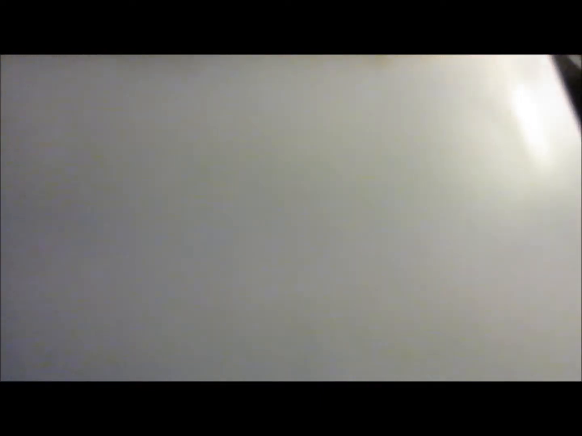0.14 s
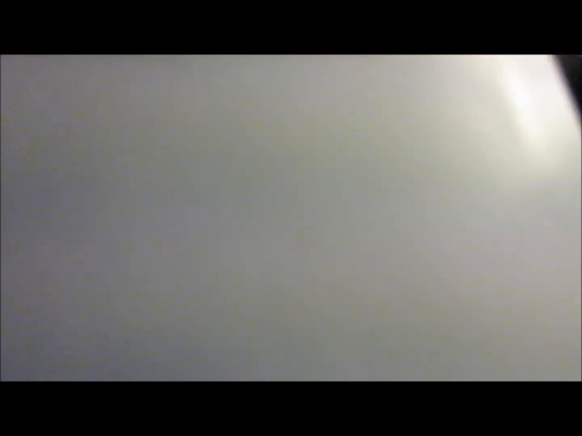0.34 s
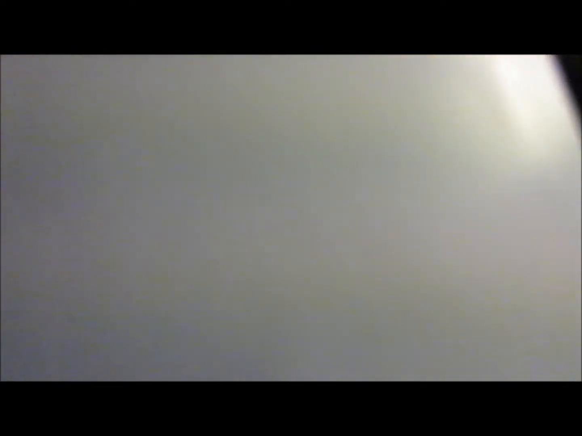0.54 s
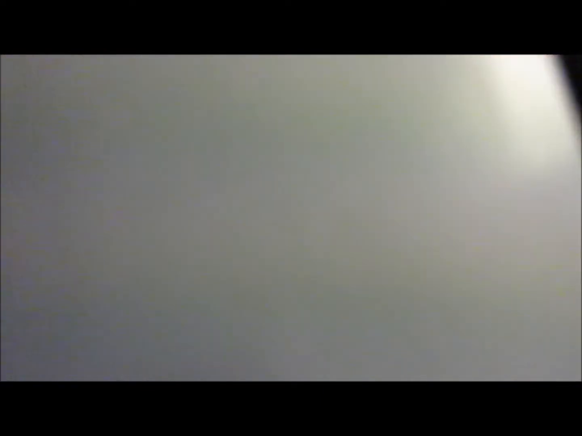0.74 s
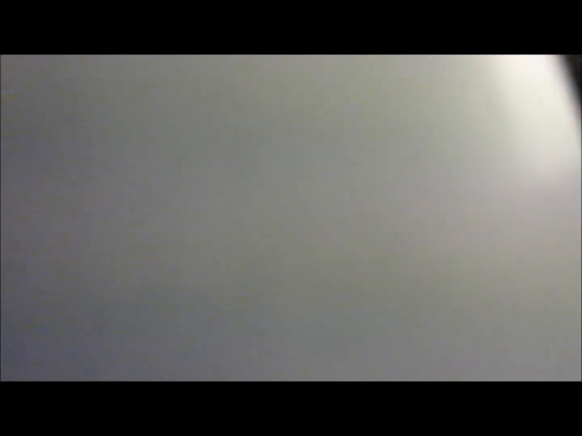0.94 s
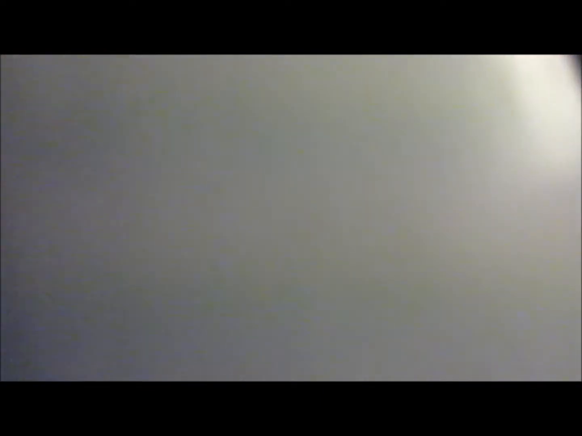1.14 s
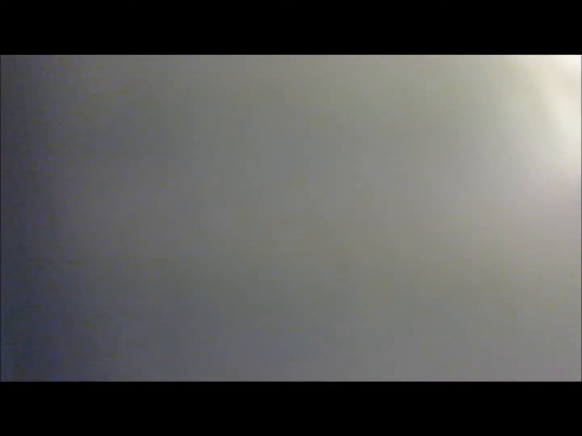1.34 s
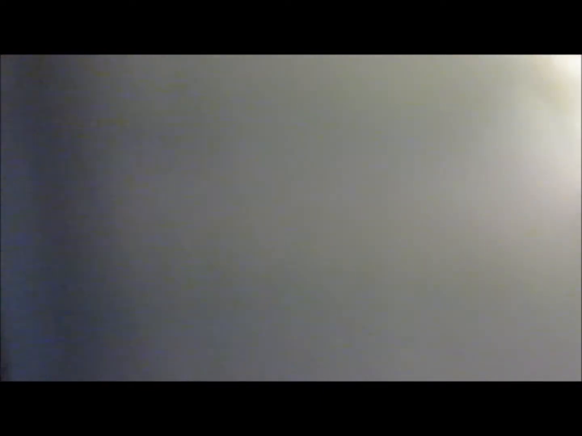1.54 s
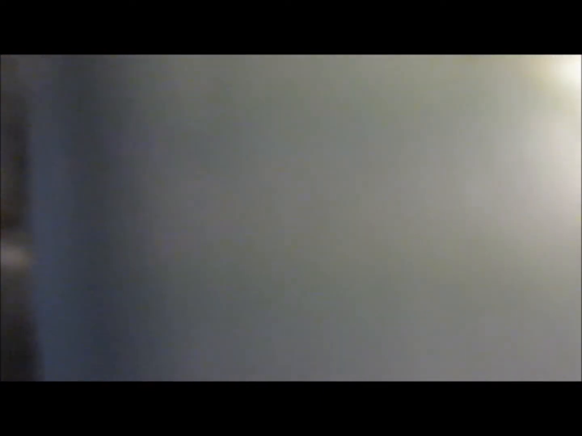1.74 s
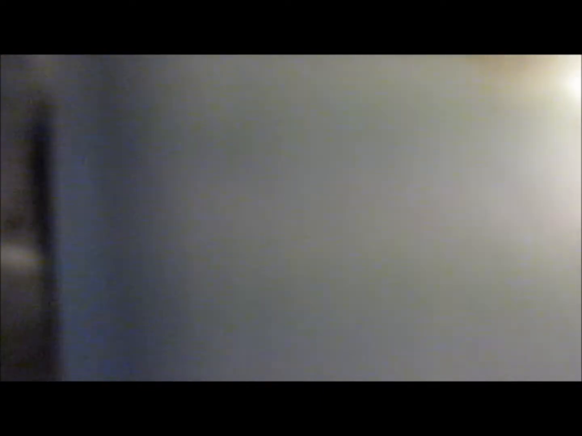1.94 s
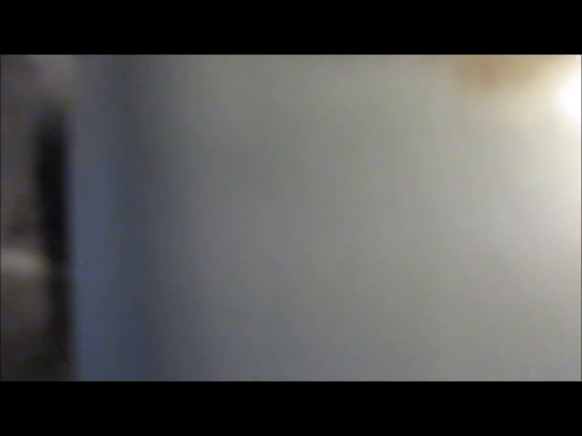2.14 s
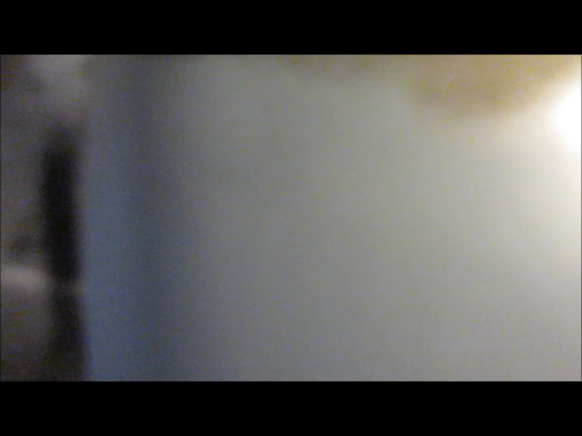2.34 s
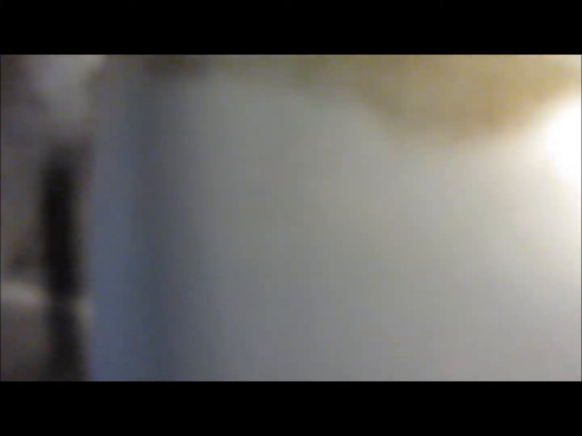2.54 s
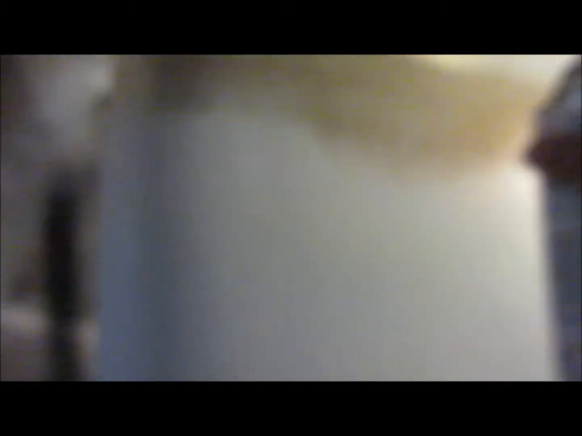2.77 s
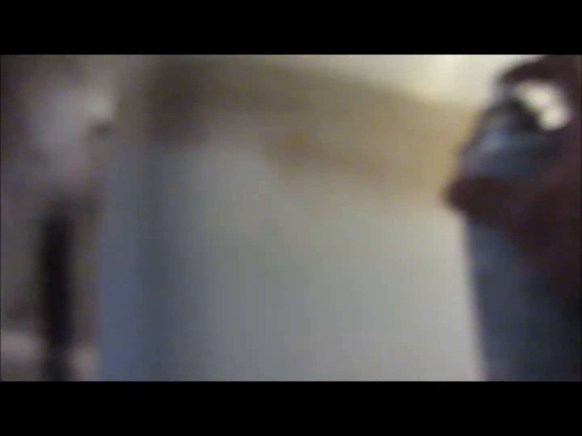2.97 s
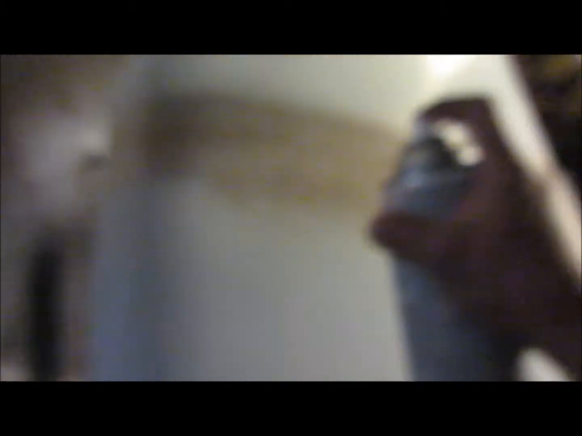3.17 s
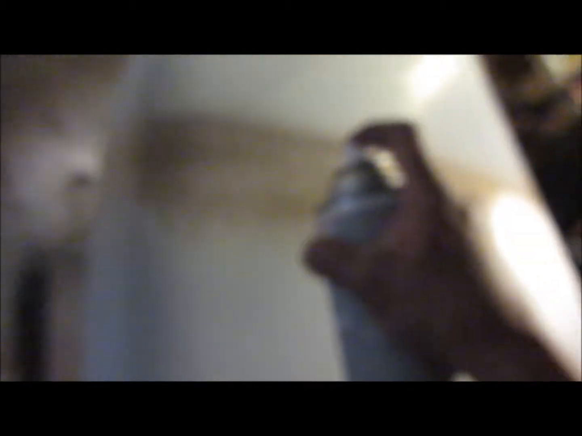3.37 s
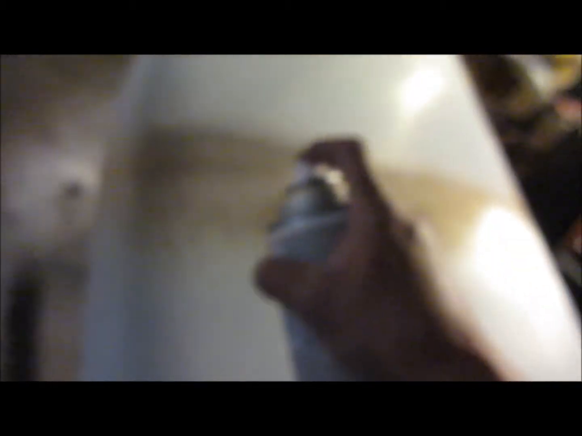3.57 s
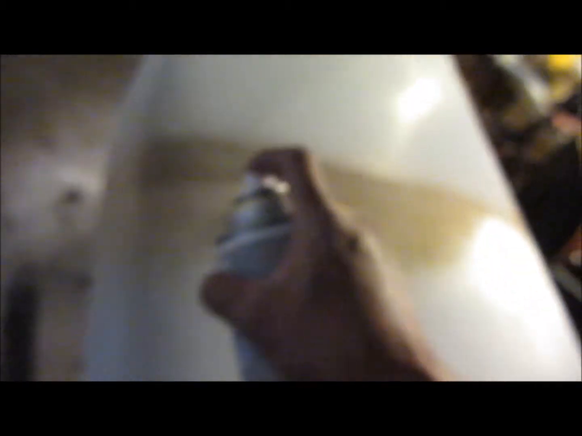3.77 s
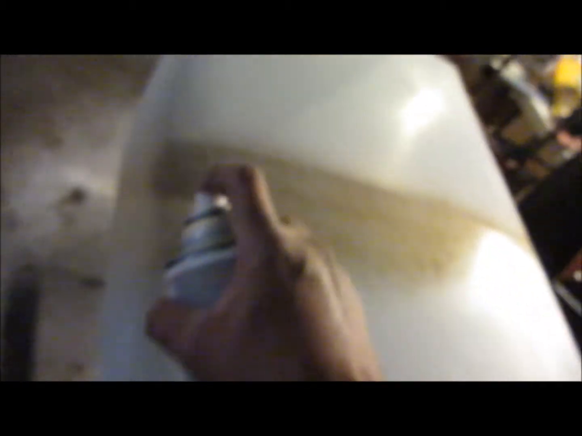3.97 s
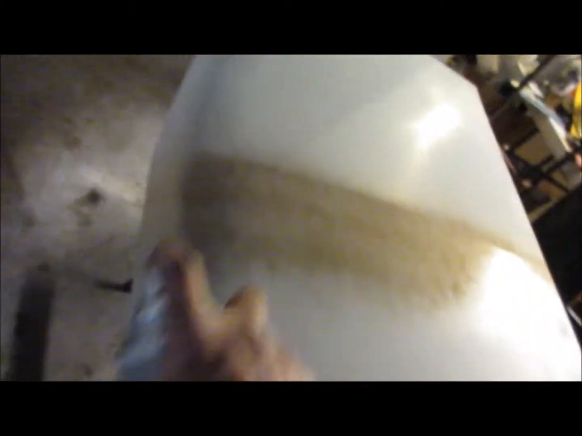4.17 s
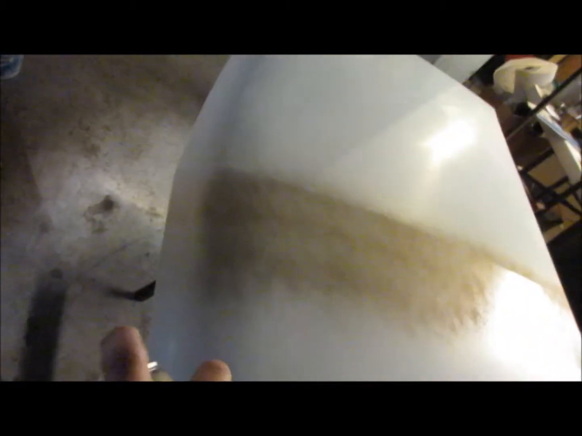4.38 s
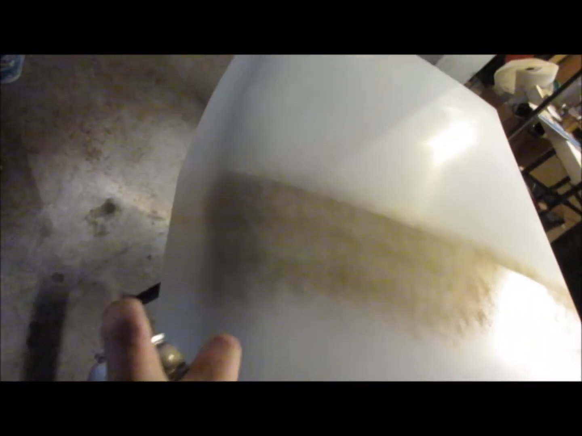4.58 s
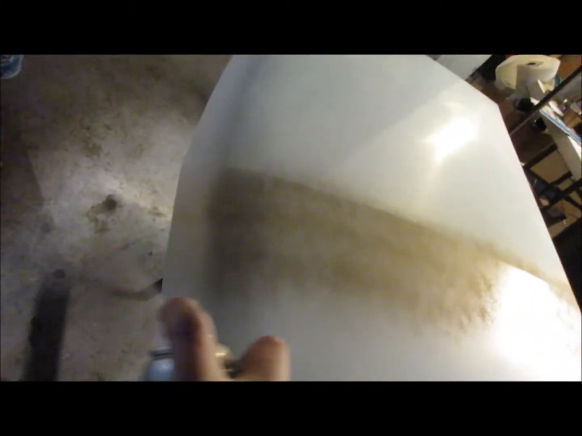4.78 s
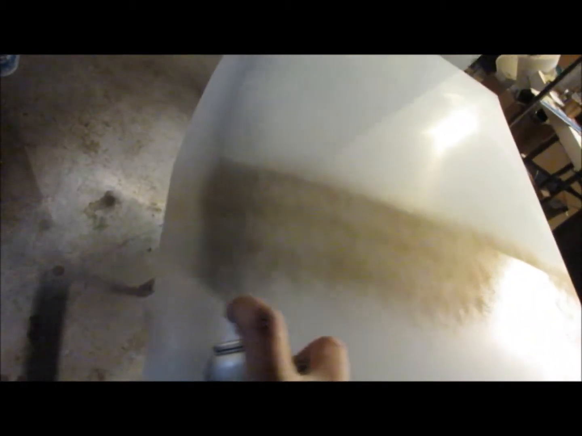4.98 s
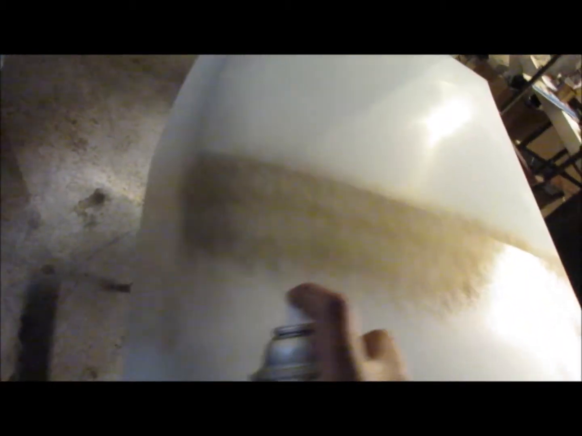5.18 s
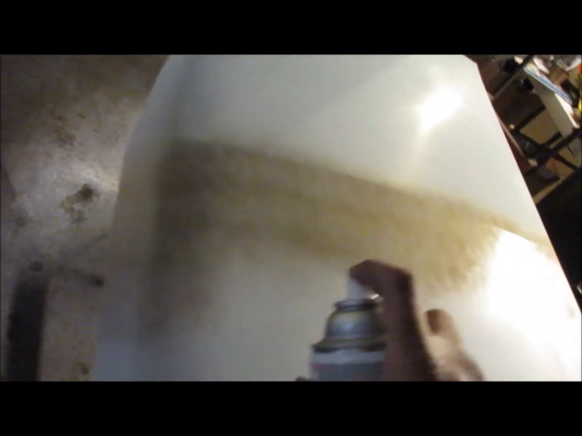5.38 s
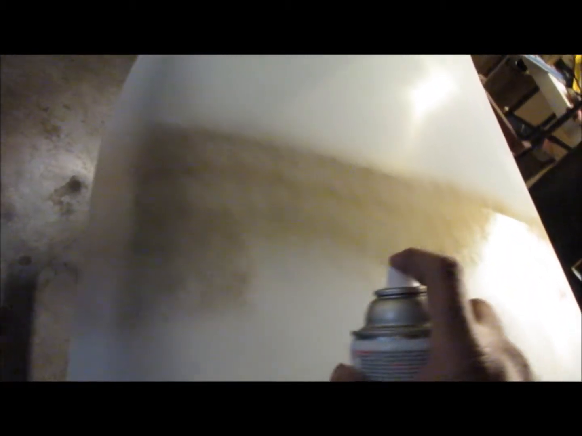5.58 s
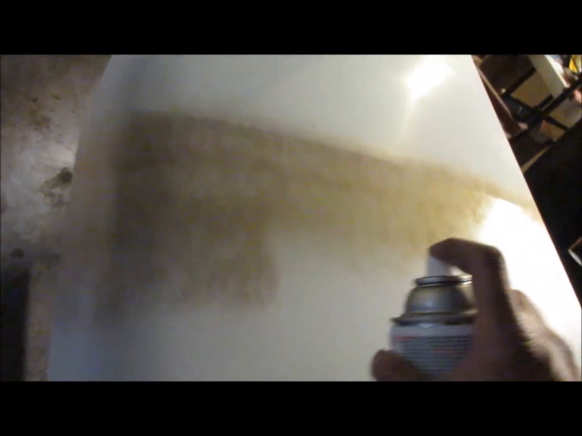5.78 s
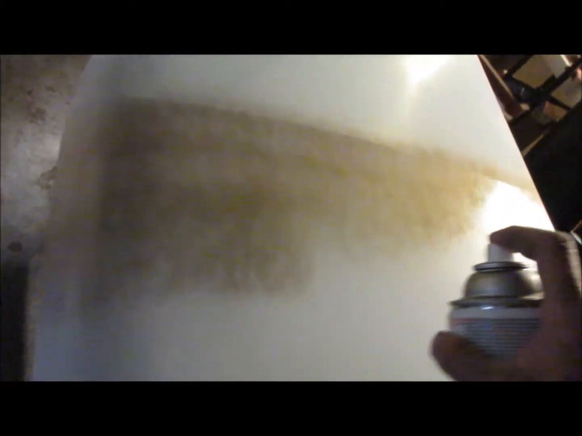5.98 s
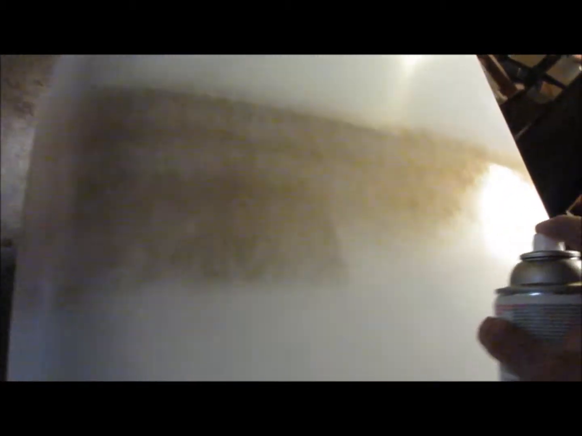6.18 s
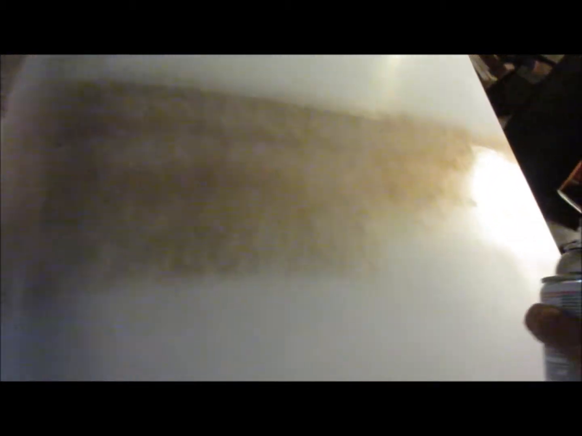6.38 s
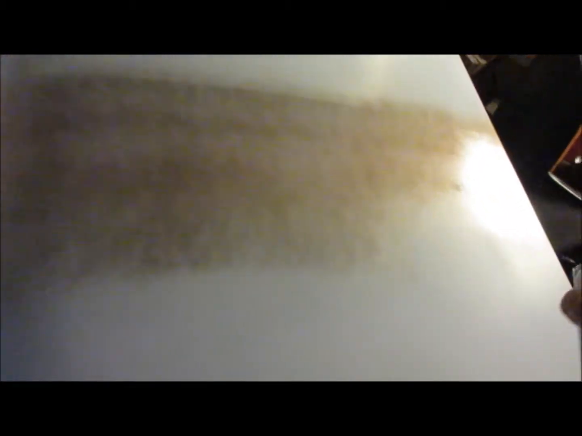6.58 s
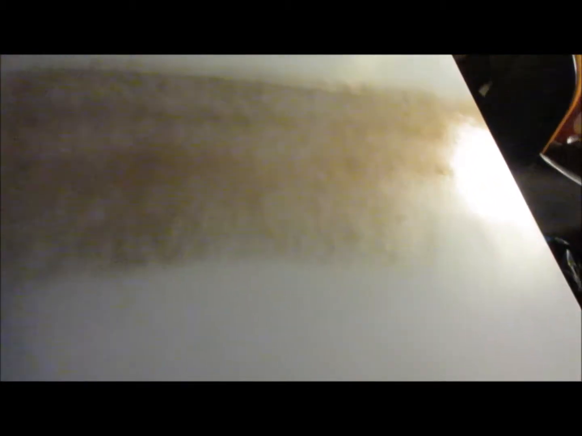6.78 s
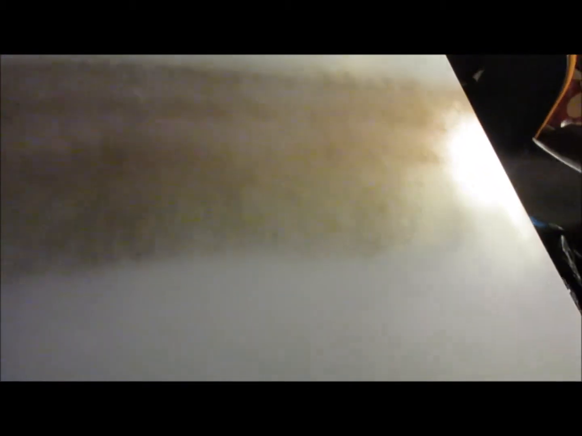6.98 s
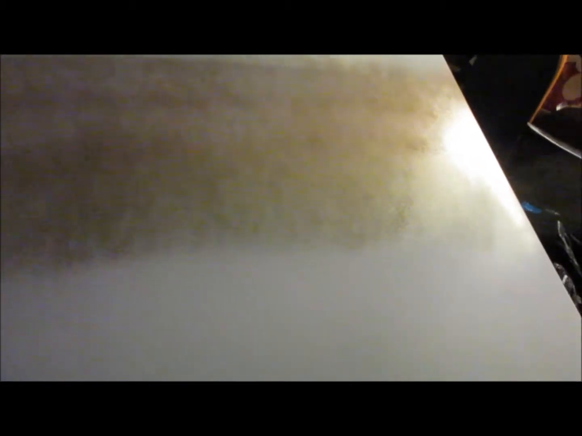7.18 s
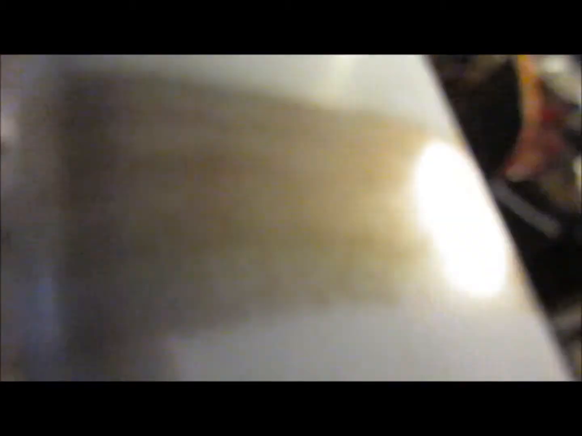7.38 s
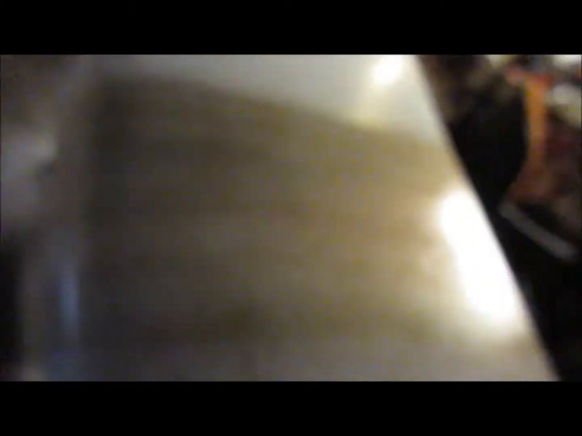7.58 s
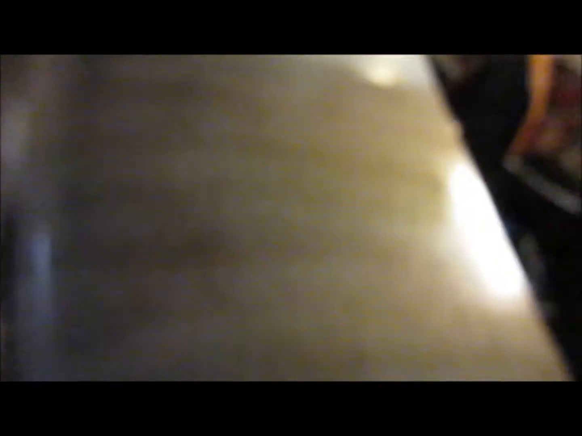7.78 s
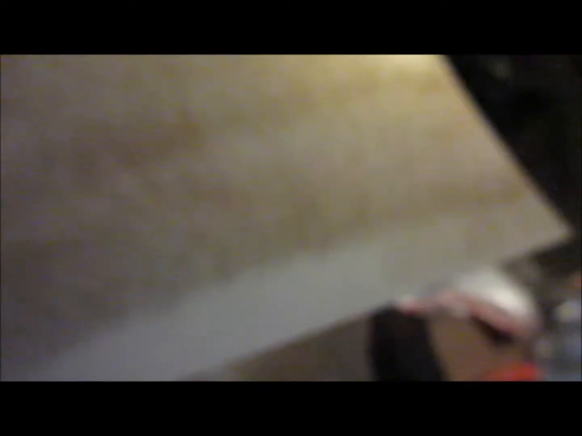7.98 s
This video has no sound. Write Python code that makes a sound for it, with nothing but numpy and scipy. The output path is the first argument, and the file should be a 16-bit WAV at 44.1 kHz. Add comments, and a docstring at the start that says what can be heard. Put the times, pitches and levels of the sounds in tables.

```python
"""A short burst of spray-can hiss, then two long passes of paint on a car panel in a garage.
The turbulent jet is heard directly and again off the panel, so a comb of notches glides through the
hiss as the hand sweeps. Soft blips, whooshes, puffs of gas and faint tones come and go over a low
rumble and mains hum. The sound is mono and cuts off abruptly during the last pass."""
import sys
import numpy as np
from scipy import signal
from scipy.fft import rfft, irfft, next_fast_len
from scipy.io import wavfile
from scipy.ndimage import uniform_filter1d, map_coordinates

SR = 44100
rng = np.random.default_rng(int(sys.argv[2]) if len(sys.argv) > 2 else 0)


def unload_audio(sound):
    """Save the sound as a 16-bit wav file, at the path given as the first command line argument."""
    columns = np.transpose(np.atleast_2d(sound))
    # keep every value between -1 and 1, then stretch to whole-number steps
    steps = np.round(np.clip(columns, -1, 1) * 32767)
    wavfile.write(sys.argv[1], SR, steps.astype(np.int16))


N = 353682
TIME = np.arange(N) / SR


def from_db(db):
    """Decibels to gain."""
    return 10 ** (np.asarray(db) / 20)


def unit_rms(x):
    """Scale to an rms of 1."""
    return x / np.sqrt(np.mean(x ** 2) + 1e-20)


def step(x):
    """A smooth step from 0 to 1 around x = 0."""
    return .5 + .5 * np.tanh(x)


def swell(start, length):
    """A rounded rise and fall."""
    return np.sqrt(2 * np.abs(np.sin(np.pi * np.clip((TIME - start) / length, 0, 1))))


def curve(points):
    """Join (seconds, value) points with straight lines."""
    return np.interp(TIME, *np.transpose(points))


def noise(spectrum):
    """Steady noise of rms 1 with a (Hz, dB) spectrum, falling away beyond its ends."""
    size = next_fast_len(N)
    hz, db = np.transpose(spectrum)
    bins = np.maximum(np.fft.rfftfreq(size, 1 / SR), 1)
    skirts = np.minimum(bins / hz[0], 1) ** 2 * np.minimum(hz[-1] / bins, 1) ** 2
    gain = from_db(np.interp(np.log(bins), np.log(hz), db)) * skirts
    return unit_rms(irfft(rfft(rng.standard_normal(size)) * gain, size)[:N])


def noise_band(hz, width):
    """Noise of rms 1 ringing through one resonance."""
    r = np.exp(-np.pi * width / SR)
    poles = [1, -2 * r * np.cos(2 * np.pi * hz / SR), r * r]
    return unit_rms(signal.lfilter([1, 0, -1], poles, rng.standard_normal(N)))


def drift(rate_hz):
    """A random wobble of rms 1, mostly slower than rate_hz."""
    r = np.exp(-2 * np.pi * rate_hz / SR)
    return unit_rms(signal.lfilter([1], [1, -2 * r, r * r], rng.standard_normal(N + SR))[SR:])


def delayed(x, lag_ms):
    """The sound heard over a longer, changing path."""
    return map_coordinates(x, [np.arange(N) - lag_ms * SR / 1000], order=3)


# The garage's rumbling bed. Each row: frequency in Hz, relative level in dB.
RUMBLE_SPECTRUM = [(32, -8), (47, -2.5), (58, -1), (69, 1), (85, -8), (110, -15.5), (200, -14.5),
                   (300, -16), (430, -14.5), (560, -20), (1100, -22.5), (2000, -20), (5000, -28.5),
                   (15000, -48)]
# Hum lines. Each row: frequency in Hz, rms level in dB, boost in dB at the microphone's first spot.
HUM_LINES = [(69.3, -50.5, 0), (120, -49, 0), (180, -59.5, 0), (202, -60, 0), (240, -56.5, 4),
             (300, -60, 0), (360, -57.5, 0)]
# Resonances in the air. Each row: centre in Hz, width in Hz, rms level in dB.
AIR_MODES = [(956, 66, -52), (1400, 110, -51.5), (3170, 180, -58.5)]

def garage_bed(rumble_db=-41.5, mic_moves_s=1.9, move_time_s=.5):
    """Rumble, resonant air and mains-driven machinery; one hum line eases as the microphone moves."""
    at_first_spot = step((mic_moves_s - TIME) / move_time_s)
    hum = sum(from_db(db + boost_db * at_first_spot) * np.sin(2 * np.pi * (hz * TIME + rng.random()))
              for hz, db, boost_db in HUM_LINES)
    air = sum(from_db(db) * noise_band(hz, width) for hz, width, db in AIR_MODES)
    return np.sqrt(2) * hum + air + from_db(rumble_db) * noise(RUMBLE_SPECTRUM)


def garage_reverb(x, predelay_s=0.0037, t60_s=0.19):
    """A short diffuse tail from the garage walls."""
    age = TIME[:SR // 2]
    tail = rng.standard_normal(len(age)) * (age > predelay_s) * np.exp(-np.log(1000) * age / t60_s)
    return signal.fftconvolve(x, tail / np.sqrt(np.sum(tail ** 2)))[:N]


# Faint wavering tones in the background, and whistles in the hiss, some thin and some broad.
# Each row: start in seconds, length in seconds, centre in Hz, width in Hz, level in dB.
FAINT_TONES = [(.56, 0.079, 1170, 20, -49), (.605, 0.054, 1010, 20, -43), (.73, .07, 1105, 18, -45.5),
               (.8, 0.08, 1038, 17, -48), (4.23, 0.55, 3100, 110, -56), (4.45, 0.32, 1102, 46, -46)]
HISS_WHISTLES = [(0.05, .42, 8340, 119.6, -41), (0.548, 0.034, 8300, 50, -55), (1.27, .16, 5520, 220, -41),
                 (1.58, 0.52, 3220, 90, -41.5), (3.48, 0.14, 4790, 100, -38),
                 (4.713, 0.51, 11800, 1300, -30.5), (5.047, 0.61, 3300, 400, -35.5),
                 (5.03, .45, 7200, 1200, -30.5), (7.046, 0.31, 5100, 350, -34)]

def whistles(rows):
    """Resonant bands of noise that swell and fade."""
    return sum(from_db(db) * swell(start, length) * noise_band(hz, width)
               for start, length, hz, width, db in rows)


# Soft whooshes. Each row: start in seconds, length in seconds, level in dB.
WHOOSHES = [(0.933, .16, -34.5), (1.39, 0.37, -39), (4.43, .2, -47), (4.603, .14, -39)]
# Their dull colour. Each row: frequency in Hz, relative level in dB.
WHOOSH_SPECTRUM = [(350, -5), (750, -1), (1150, 0), (1800, -0.5), (2200, -8.5), (3000, -11)]

def whooshes():
    """Brief swells of dull noise."""
    envelope = sum(from_db(db) * swell(start, length) for start, length, db in WHOOSHES)
    return envelope * noise(WHOOSH_SPECTRUM)


# Soft low blips. Each row: start in seconds, length in seconds, first and last pitch in Hz,
# level in dB, octave overtone in dB against the fundamental.
BLIPS = [(1.117, 0.048, 410, 294, -29.5, -10), (1.307, 0.17, 146, 139.4, -42, -8),
         (3.538, 0.028, 195, 223, -34, -7), (4.584, 0.15, 140, 145, -45, -20)]

def blips(roughness=0.29):
    """Short dull gliding tones with one overtone and a wavering level."""
    waver = 1 + roughness * drift(60)
    out = np.zeros(N)
    for start, length, first_hz, last_hz, db, overtone_db in BLIPS:
        pitch_hz = np.interp(TIME, [start, start + length], [first_hz, last_hz])
        phase = 2 * np.pi * np.cumsum(pitch_hz) / SR
        tone = np.sin(phase) + from_db(overtone_db) * np.sin(2 * phase)
        out += from_db(db) * swell(start, length) * tone
    return out * waver


# Tiny puffs of gas. Each row: start in seconds, level in dB, decay time in seconds.
PUFFS = [(0.769, -44.5, .026), (0.854, -34, .008), (4.43, -53, .015), (4.465, -51, .025),
         (4.718, -35.5, .015)]
# Their bright colour. Each row: frequency in Hz, relative level in dB.
PUFF_SPECTRUM = [(3000, -10.5), (5000, -15.5), (6300, 3), (8200, -0.5), (9500, -16), (14000, -19)]

def valve_puffs():
    """A little gas escapes as the finger settles on the valve."""
    envelope = sum(from_db(db) * (TIME > start) * np.exp(-np.abs(TIME - start) / decay)
                   for start, db, decay in PUFFS)
    return envelope * noise(PUFF_SPECTRUM)


# The hand's path along the panel. Each row: time in seconds, lag of the panel's bounce in ms.
HAND_PATH = [(0.0, 0.877), (0.39, 0.804), (0.94, 0.774), (1.34, 0.937), (2.31, 1.042), (3.4, 1.466),
             (3.93, 1.522), (5.0, 1.492), (5.51, 1.353), (5.91, 1.281), (6.72, 1.092), (7.01, 1.081),
             (7.35, 0.987)]

def hand_sweep(inertia_s=.15, far_from_ms=1.22, blend_ms=.12):
    """The arm's inertia rounds the sweep; gives the bounce lag and a 0-1 blend into the far end."""
    lag_ms = uniform_filter1d(curve(HAND_PATH), int(inertia_s * SR), mode="nearest")
    far = step((lag_ms - far_from_ms) / blend_ms)
    return lag_ms, far


# Weak echoes off hand, floor and bodywork. Each row: delay in ms, share of the panel lag added, gain.
ECHOES = [(0, 0.66, 0.064), (2.1, .6, 0.023), (4.3, 0.91, 0.074), (6.6, 0.673, .11), (7.1, .8, 0.13)]
BOUNCE_ON_PANEL, BOUNCE_PAST_EDGE = .47, .16  # gain against the direct sound
LEAVES_PANEL_S, RETURNS_S, CROSSING_S = 3.75, 5.45, .18  # the can overshoots the edge and comes back
SPREAD_NEAR, SPREAD_FAR = 0.24, 0.71  # share of the lows that misses the panel at each end of the sweep

def with_panel_bounce(x, lag_ms, far, beam_hz=3000):
    """The hiss plus its bounce about a millisecond later: a gliding comb, shallower past the edge."""
    past_edge = step((TIME - LEAVES_PANEL_S) / CROSSING_S) * step((RETURNS_S - TIME) / CROSSING_S)
    bounce_gain = BOUNCE_ON_PANEL + (BOUNCE_PAST_EDGE - BOUNCE_ON_PANEL) * past_edge
    # the nozzle beams its treble at the panel, while lower sound spreads past it
    spread = SPREAD_NEAR + (SPREAD_FAR - SPREAD_NEAR) * far
    lows = signal.sosfiltfilt(signal.butter(1, beam_hz, fs=SR, output="sos"), x)
    bounce = bounce_gain * delayed(x - spread * lows, lag_ms)
    echoes = sum(gain * delayed(x, own_ms + share * lag_ms) for own_ms, share, gain in ECHOES)
    return (x + bounce + echoes) / np.sqrt(1 + bounce_gain ** 2)


def valve_flow(pressed, eased, opening, closing):
    """Flow from 0 to 1: it jumps up under the finger and is choked off as the stem springs back."""
    rise = 1 - np.exp(-np.maximum(TIME - pressed, 0) / opening)
    return rise / (1 + (np.maximum(TIME - eased, 0) / closing) ** 3)


# The jet's four colours: main hiss, throaty mids, top sizzle and the rush on the panel.
# Each row: frequency in Hz, relative level in dB.
HISS_SPECTRUM = [(2000, -44.5), (4000, -7.5), (5000, -3), (6500, -3), (7300, -1), (8600, -1), (10000, -3.5),
                 (12000, -5), (13500, -14.5), (15500, -25.5)]
THROAT_SPECTRUM = [(1200, -10.5), (2400, -5), (3200, 0), (4200, 0.5), (5200, -11), (7000, -36)]
SIZZLE_SPECTRUM = [(10500, -24.5), (12500, -2), (13800, 2), (15500, 0)]
RUSH_SPECTRUM = [(150, -34), (330, -6.5), (520, -3.5), (760, 1.5), (1100, 1.5), (1400, 0), (2000, 5),
                 (2500, -3), (4000, -15)]
# Thin rings of nozzle and can. Each row: centre in Hz, width in Hz, level in dB against the hiss.
NOZZLE_MODES = [(7010, 160, -20.5), (8440, 40, -29.5)]
# Fader ride as the nozzle turns to and from the microphone.
# Each row: time in seconds, level in dB before the trim.
HISS_RIDE = [(0.03, -24.5), (0.392, -25), (0.45, -25.5), (0.89, -26), (1.01, -25.5), (2.93, -24),
             (3.58, -24.5), (4.08, -26.5), (4.12, -26.5), (4.8, -23), (4.97, -25.5), (5.12, -22),
             (5.47, -22), (6.03, -20.5), (7.32, -23)]
# The three passes. Each row: press, release, opening time and closing time in seconds, throat and
# sizzle in dB against the hiss, rush level in dB. The sweep then shifts these three levels.
PASSES = [(-0.1, 0.46, 0.01, 0.027, -11.5, -5, -37), (0.855, 4.175, 0.012, 0.03, -9.5, -3, -35),
          (4.723, 7.5, 0.013, 0.02, -7, -5.5, -36.5)]
THROAT_DB_PER_MS, MID_SWEEP_MS = 5, 1.13  # throatier as the bounce lag grows
FAR_SIZZLE_DB, FAR_RUSH_DB = -4, 1.5  # less sizzle and more rush at the far end

def spray_jet(lag_ms, far, flutter_db=0.55, sputter_db=0.86, trim_db=1.0):
    """Turbulence at the nozzle and a rush where the jet lands; uneven paint makes the flow flutter."""
    ride = from_db(curve(HISS_RIDE) + trim_db)
    hiss = noise(HISS_SPECTRUM)
    for hz, width, db in NOZZLE_MODES:
        hiss += from_db(db) * noise_band(hz, width)
    throat = from_db(THROAT_DB_PER_MS * (lag_ms - MID_SWEEP_MS)) * noise(THROAT_SPECTRUM)
    sizzle = from_db(FAR_SIZZLE_DB * far) * noise(SIZZLE_SPECTRUM)
    rush = from_db(FAR_RUSH_DB * far) * noise(RUSH_SPECTRUM)
    out = np.zeros(N)
    for pressed, eased, opening, closing, throat_db, sizzle_db, rush_db in PASSES:
        nozzle = ride * (hiss + from_db(throat_db) * throat + from_db(sizzle_db) * sizzle)
        out += valve_flow(pressed, eased, opening, closing) * (nozzle + from_db(rush_db) * rush)
    return out * from_db(flutter_db * drift(25) + sputter_db * drift(440))


def scene(reverb_db=-11.5):
    """The can close by, the garage around it, the same in both channels."""
    lag_ms, far = hand_sweep()
    spray = with_panel_bounce(spray_jet(lag_ms, far), lag_ms, far)
    close = spray + whistles(HISS_WHISTLES) + valve_puffs() + blips() + whooshes()
    mono = close + from_db(reverb_db) * garage_reverb(close) + garage_bed() + whistles(FAINT_TONES)
    return np.array([mono, mono])


def record(dry, stop_s=7.3475, cutoff_hz=15080):
    """A hard cut to silence in mid-spray, and a steep low-pass on the top end."""
    low_pass = signal.firwin(601, cutoff_hz, fs=SR, window=("kaiser", 9))
    return signal.fftconvolve(dry * (TIME < stop_s), low_pass[None], mode="same", axes=1)


dry = scene()
out = record(dry)
unload_audio(out)
```